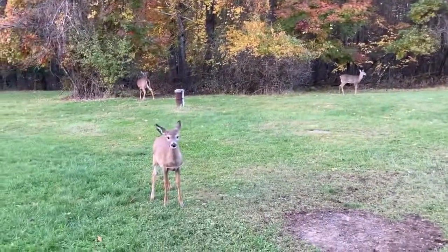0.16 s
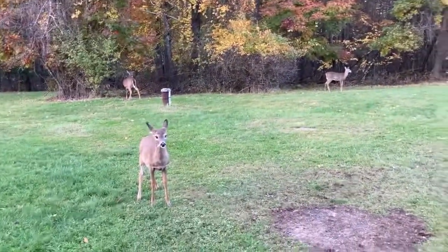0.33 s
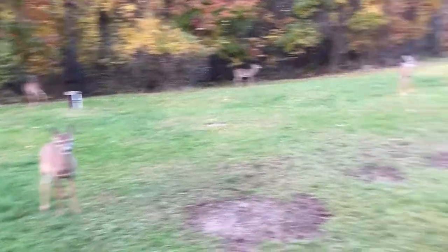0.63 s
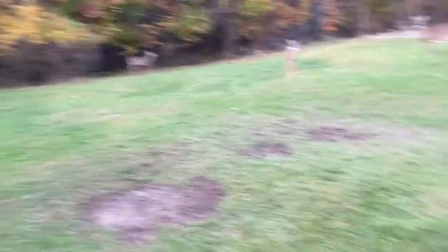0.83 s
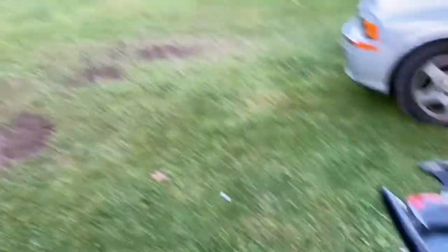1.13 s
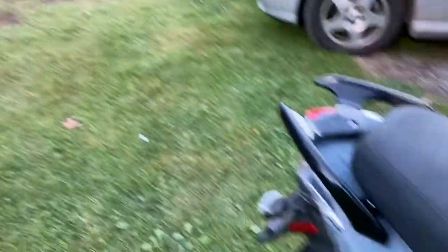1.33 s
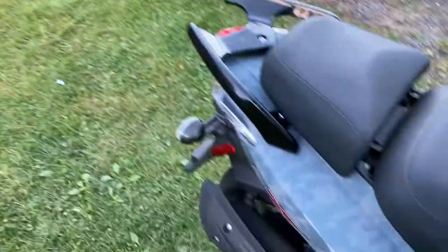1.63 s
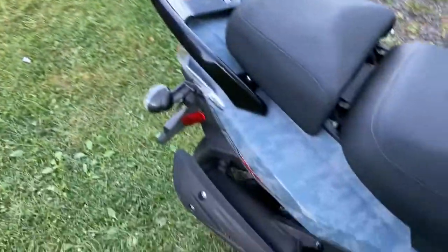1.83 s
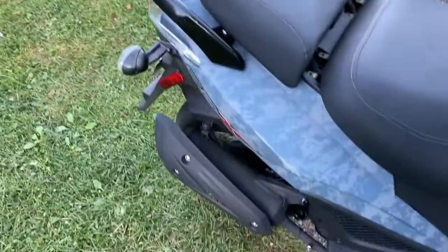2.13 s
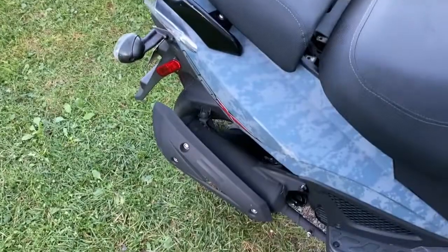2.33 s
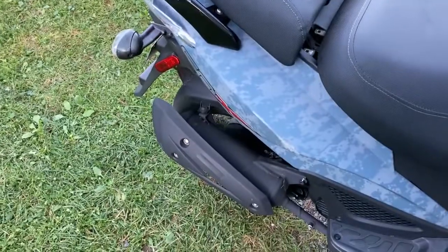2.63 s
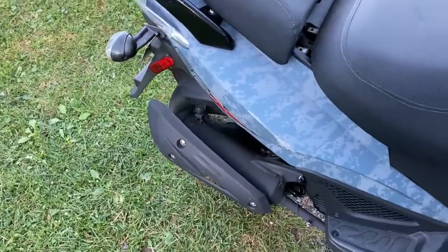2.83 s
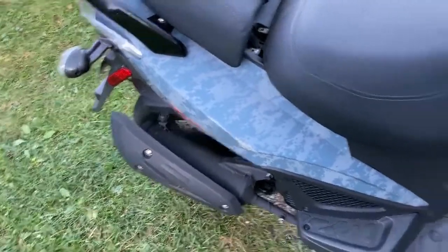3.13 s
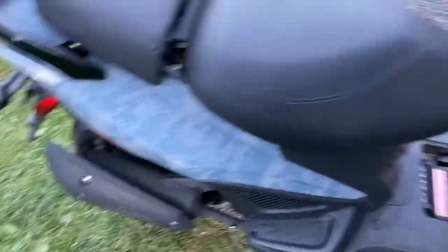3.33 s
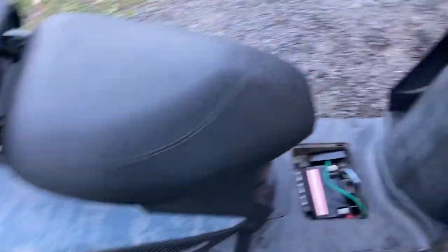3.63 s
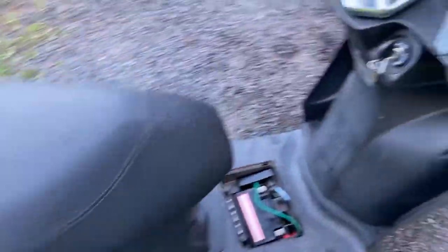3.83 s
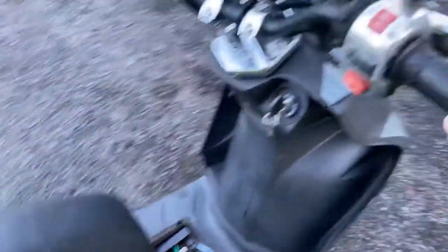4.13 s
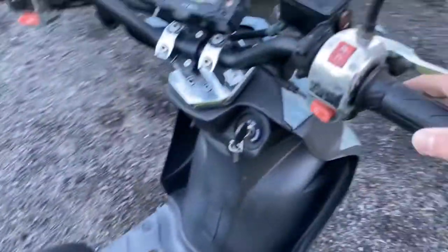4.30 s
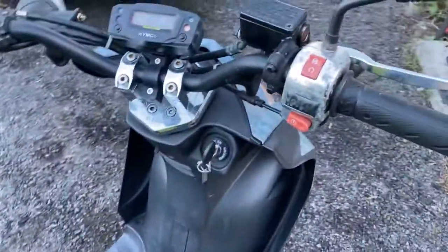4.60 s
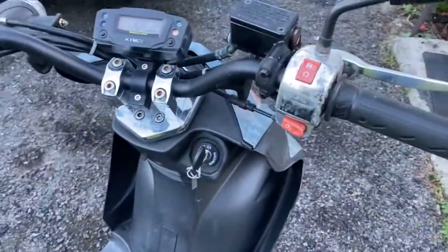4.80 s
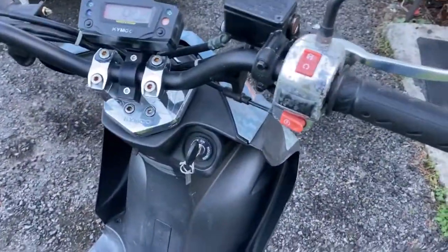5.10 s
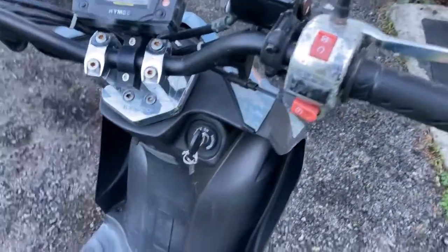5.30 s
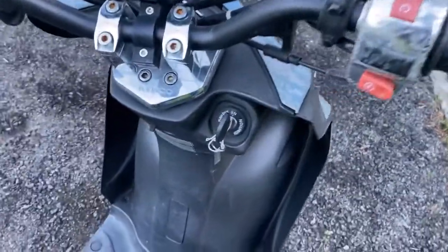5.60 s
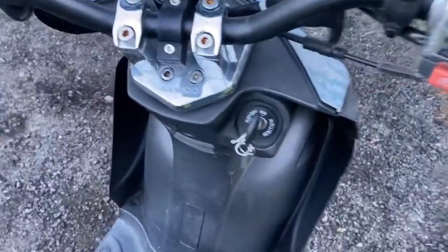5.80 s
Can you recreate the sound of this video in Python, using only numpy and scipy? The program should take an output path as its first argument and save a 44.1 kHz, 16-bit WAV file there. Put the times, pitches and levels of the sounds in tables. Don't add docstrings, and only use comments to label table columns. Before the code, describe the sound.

A small single-cylinder scooter engine is already at full throttle outdoors, standing still, heard through a hand-held phone. From 0 to about 0.5 s the phone faces the field and the drone is somewhat muffled: a low, flat buzz near 64 pulses a second, with rough exhaust and intake roar. Between 0.5 and 1.6 s it swings towards the machine, and the sound grows louder, fuller and brighter. From 1.6 to 3.3 s it is beside the engine, with metallic valve clatter, thin whine and strong airy fan hiss, pitch still steady. From 3.3 to 4.4 s it passes along the seat to the handlebars; clatter and hiss recede, and a faint high chirping buzz appears around 3.8 s. At 4.45 s the throttle closes: roar weakens and pitch slides down by more than half an octave. Around 5.35 s the idle catches, puttering in distinct low puffs with another small chirp, still slowing slightly at the end.

```python
import sys
import numpy as np
from scipy import signal
from scipy.fft import rfft, irfft, next_fast_len
from scipy.io import wavfile
from scipy.ndimage import map_coordinates

SR = 44100
rng = np.random.default_rng(int(sys.argv[2]) if len(sys.argv) > 2 else 0)


def volts_from_db(level):
    exponent = np.asarray(level, float) / 20
    return 10 ** exponent


def inscribe(sig):
    pcm = np.round(np.clip(np.atleast_2d(sig).T, -1, 1) * 32767)
    wavfile.write(sys.argv[1], SR, pcm.astype(np.int16))


N = 262395

# t/s, firing rate f/Hz
FIRING_HZ = [(0, 63.9), (.2, 64.3), (.95, 64.5), (1.25, 64.9), (1.7, 64.4), (2.5, 64.5), (2.92, 64.3),
             (3.38, 64.7), (3.69, 64.4), (3.96, 63.5), (4.39, 64), (4.45, 63.4), (4.71, 56.8), (5.01, 50.1),
             (5.2, 45.5), (5.47, 41.4), (5.65, 40.5), (5.95, 38.7)]
# t/s, left lag/ms, facing scooter/0-1, near engine/0-1, side-on/0-1
POSE = [(0, 0.24, 0, 0.78, 0.04), (.45, 0.2, 0.07, 0.86, 0.12), (.8, 0.24, 0.27, 0.98, 0.37),
        (1.0, 0.18, 0.47, 1, 0.4), (1.25, 0.11, 0.79, 1, 0.45), (1.6, 0.0083, .97, 0.88, 0.62),
        (2.7, 0.019, 0.96, 0.96, 0.94), (3.3, -.04, 1, 0.8, 0.83), (3.7, -0.096, 1, 0.43, 0),
        (4.1, -0.11, 1, 0.1, 0), (4.45, -0.095, 1, 0, 0)]

# multiple/1, level/dB
TURNED_AWAY = [(3, -19), (5, -34), (7, -44), (8, -19), (9, -28), (10, -18.5), (11, -21), (12, -20.5),
               (13, -19.5), (14, -45), (15, -21), (16, -29), (17, -25), (18, -24), (19, -35), (20, -15),
               (21, -30), (22, -15), (23, -24), (25, -16), (26, -34), (27, -39), (28, -22), (29, -29),
               (30, -18), (33, -11)]
PULLING = [(3, -22), (5, -16), (7, -16), (8, -12), (9, -19), (10, -20), (11, -24), (12, -18), (13, -21),
           (14, -21), (15, -22), (16, -21), (17, -23), (18, -18), (19, -20), (20, -21), (21, -24),
           (22, -19), (23, -24), (25, -20), (26, -24), (27, -22), (28, -20), (29, -18), (30, -22),
           (31, -22), (32, -23), (33, -16), (34, -26), (35, -29)]
ABOVE_SEAT = [(3, -32), (5, -20), (7, -41), (8, -15.5), (9, -14), (10, -43), (11, -34), (12, -14.5),
              (13, -38), (14, -28), (15, -38), (16, -18.5), (17, -30), (18, -16), (19, -39), (20, -37),
              (21, -26), (22, -38), (23, -41), (25, -16.5), (26, -24), (27, -38), (28, -25), (29, -19),
              (30, -17)]
SHUTTING = [(3, -32), (5, -28), (7, -31), (8, -14), (9, -23), (10, -20), (11, -33), (12, -36), (13, -38),
            (14, -40), (15, -33), (16, -28), (17, -28), (18, -22), (19, -39), (20, -23)]
COASTING = [(3, -24), (5, -24), (7, -13), (8, -17), (9, -28.5), (10, -22), (11, -41), (12, -17.5),
            (13, -44), (14, -46), (15, -31), (16, -41), (17, -42), (18, -32), (19, -21), (20, -25)]
# multiple of firing rate/1, level/dB
BELT = [(1.685, -12.5), (5.7, -9), (6.72, -5)]

# f/Hz, level/dB
PUFFS = [(20, -14), (45, -8), (100, -7), (200, -9.5), (320, -5), (450, -6), (600, -6.5), (730, -14),
         (1000, -37)]
INTAKE_SIDE = [(500, -89), (740, -2.5), (900, -2), (1300, -2.5), (1600, 0), (2150, -2.5), (2300, -8),
               (2700, -12), (3100, -14), (4500, -47)]
INTAKE_FRONT = [(500, -58), (740, 0), (1000, 2), (1900, 2), (2300, 1), (2750, 0), (3100, -5), (3600, -7.5),
                (5000, -37)]
CASES_SIDE = [(2400, -50), (3200, -6.5), (3450, 2.5), (4100, -4), (4700, 0.5), (5200, -4), (5950, -29),
              (6400, -27), (6950, -9.5), (7300, -21.5), (8150, -2.5), (8700, -28), (11000, -36)]
CASES_FRONT = [(2400, -47), (3200, 4), (3900, 7.5), (4300, 14), (5000, 11.5), (5900, -15), (6700, -19),
               (8000, -38), (11000, -40)]
FAN_SIDE = [(3000, -37), (6000, 7.5), (8000, 4), (9700, 4.5), (11300, 2.5), (12300, 5), (13500, 1.5),
            (14700, -2), (15700, -1)]
FAN_FRONT = [(3000, -14), (6000, -0.5), (7500, -3), (9100, 1.5), (10300, 0), (11000, -1.5), (12600, 0.5),
             (14000, -1), (15700, -8.5)]
# f/Hz, level/dB
SCATTER = [(60, -3), (250, -11.5), (450, -6.5), (800, -9), (1500, -4), (2500, -5), (3600, -4), (5500, 0)]
# f/Hz, width/Hz, level/dB
FIN_RINGS = [(3490, 73, 5.5), (3770, 160, 6.5), (4050, 240, 6.5), (4300, 90, 4), (4594, 57, 5.5),
             (6300, 71, 6), (6470, 150, -2), (7200, 120, -3), (7300, 120, -8)]

PIPE = {1: (-22, -3, -3.5, -8.5, -6), 2: (-24, 0.4, -4, 4.5, 3), 4: (-21, -9, 0, -6.5, -9.5),
        6: (-23, -11.5, -3.5, 4, -15)}
SPRINGS = (-62, 18, -8, -8, -3)
WEAK, BELT_HUM, CHAIN = (-22.5, -3, -4, 6.5, -8.5), (-34.5, 0, -6, -10, -13), (-28, -11, -17, 3.5, -4)
PUFFING, ROAR = (-31, -5, -.3, 1.4, -3.5), (-25, -4.5, -1.4, -1, -7)
CLATTER, FANNING = (-31, -4.5, -12.5, -0.8, -8), (-38, -9, -5, -2, -9)
PANEL_BUZZ = (-82, -1.5, 8, .1, 2)

# t/s, multiple/1, half width/s, loss/dB (negative lifts the tone)
DIPS_AND_SWELLS = [(.03, 6, 0.036, 11), (.23, 6, .03, 9), (3.8, 4, 0.22, -2), (3.7, 6, 0.7, 3.5),
                   (3.92, 2, 0.23, 2), (4.61, 4, 0.059, 22), (4.6, 6, 0.11, -3.5), (5.04, 4, 0.032, 23),
                   (5.13, 6, 0.1, 9), (5.43, 4, 0.19, 11), (5.422, 6, 0.085, 10), (5.55, 6, 0.2, -2.5),
                   (6.1, 4, .3, -3.5), (0.98, 6, 0.26, -3.5), (5.51, 12, 0.2, -13.5), (5.03, 8, 0.16, -7),
                   (4.56, 8, .12, -1.5), (5.65, 10, .2, -7), (5.55, 8, .12, -8)]
# t/s, length/s, level/dB
CHIRPS = [
    (3.78, .6, -57),
    (5.365, .7, -48.5),
]

# f/Hz, left over right level/dB, left lead/rad
LEAN_AWAY = [(60, -4, -0.22), (130, -3, -.1), (260, -6, -0.13), (390, -6, -0.73), (700, -9.5, -0.41),
             (1410, -2, 0.13), (2500, -1, 0.37), (5000, 1.5, -0.046)]
LEAN_SIDE = [(60, -2.1, -0.11), (130, -2.6, .13), (260, -2, -0.24), (390, .5, 0.068), (815, -0.5, -0.19),
             (1660, 5, -0.36), (2470, 2, -.6), (3600, 1.7, 0.45)]
LEAN_FRONT = [(60, -2.5, -0.15), (130, -2.2, .1), (260, -0.7, -0.0013), (372, -0.3, 0.56), (650, 3, 0.38),
              (1000, 6, 0.52), (1910, 5, -0.029), (4200, 0.5, 0.25)]

SHUT_S, SNAP_S, SAG_S = 4.45, 0.061, 0.69
CATCH_S, RECOVER_S, IDLE_EFFORT = 5.33, 0.048, 0.35
PULSE_RAD = 1.625


def unit(x):
    return x / np.sqrt(np.mean(x ** 2) + 1e-20)


def along(points, hz):
    f, v = np.transpose(points)
    return np.interp(np.log(hz + 1), np.log(f + 1), v)


def curves(rows):
    s, *cols = np.transpose(rows)
    return [np.interp(np.arange(N) / SR, s, c) for c in cols]


def ramp(start_s, length_s):
    return np.clip((np.arange(N) / SR - start_s) / length_s, 0, 1)


def wobble(rate_hz):
    knots = rng.standard_normal(int(N * rate_hz / SR) + 4)
    return np.interp(np.arange(N) * rate_hz / SR, np.arange(len(knots)), knots)


def filtered(x, response):
    m = next_fast_len(N + SR // 4)
    spectrum = rfft(x, m) * response(np.fft.rfftfreq(m, 1 / SR))
    return irfft(spectrum, m)[..., :N]


def coloured(x, spectrum):
    return unit(filtered(x, lambda hz: volts_from_db(along(spectrum, hz))))


def resonance(f, centre_hz, width_hz):
    damping = 1j * f * width_hz
    return damping / (centre_hz ** 2 - f * f + damping)


def controls():
    facing, near = np.clip(curves(POSE)[1:3], 0, 1)
    lost = ramp(SHUT_S, SAG_S) - IDLE_EFFORT * ramp(CATCH_S, RECOVER_S)
    return np.array([1 - facing, 1 - near, ramp(SHUT_S, SNAP_S), lost])


def heard(layer):
    return layer[0] + np.dot(layer[1:], controls())


def sharpness():
    sharp_from_hz, sharp_over_hz = 59.2, 23
    return np.clip((sharp_from_hz - curves(FIRING_HZ)[0]) / sharp_over_hz, 0, 1)


def dips(k):
    t = np.arange(N) / SR
    return sum(db * np.clip(1 - abs(t - s) / half_s, 0, 1) for s, m, half_s, db in DIPS_AND_SWELLS if round(m) == k)


def tone(turn, shake_db, rate_hz, free=1):
    drift = np.pi * rng.uniform(-1.06, 1) + 0.054 * shake_db * wobble(rate_hz)
    return np.sqrt(2) * volts_from_db(shake_db * wobble(rate_hz)) * np.cos(turn + free * drift)


def racket(cycle, repeat, beat_db, size=700):
    slot = (cycle / (2 * np.pi) % 1 * size).astype(int)
    drift = 1.3 * wobble(3)
    shapes = rng.standard_normal((2, 2, size))[..., slot]
    habit = np.cos(drift) * shapes[0] + np.sin(drift) * shapes[1]
    share = np.clip(repeat, 0, 1)
    mix = np.sqrt(share) * habit + np.sqrt(1 - share) * rng.standard_normal((2, N))
    beat = np.cos(cycle) + 0.64 * np.cos(2 * cycle + 0.37)
    return mix * volts_from_db(beat_db * beat + 0.68 * wobble(13))


def seen(x, share, side, front):
    return share * coloured(x, side) + (1 - share) * coloured(x, front)


def side_on():
    return np.clip(curves(POSE)[-1], 0, 1)


def panel(cycle):
    edge_s = 0.029
    kicks = rng.standard_normal(N) * volts_from_db(4.5 * np.cos(2 * cycle) + .8 * wobble(25))
    ringing = unit(filtered(kicks, lambda f: resonance(f, 5830, 45)))
    spells = sum(volts_from_db(db) * (ramp(s, edge_s) - ramp(s + length_s, 4 * edge_s)) for s, length_s, db in CHIRPS)
    return (volts_from_db(heard(PANEL_BUZZ)) + spells) * ringing


def fan(cycle):
    air = racket(cycle, repeat=0.076, beat_db=1.38)
    return volts_from_db(heard(FANNING) + 7.5) * seen(air, side_on(), FAN_SIDE, FAN_FRONT)


def cases_on():
    return np.clip(1.7 * side_on(), 0, 1)


def fins(x):
    return filtered(x, lambda f: 1 + sum((volts_from_db(db) - 1) * resonance(f, c, w) for c, w, db in FIN_RINGS))


def clatter(cycle):
    knocks = fins(racket(cycle, repeat=.65, beat_db=1.5))
    return volts_from_db(heard(CLATTER) + 2.5) * seen(knocks, cases_on(), CASES_SIDE, CASES_FRONT)


def intake(cycle):
    air = racket(cycle, repeat=0.11, beat_db=0.4)
    return volts_from_db(heard(ROAR) - 0.62) * seen(air, cases_on(), INTAKE_SIDE, INTAKE_FRONT)


def gas_puffs(cycle):
    return volts_from_db(heard(PUFFING) + 2.5) * coloured(racket(cycle, repeat=0.019, beat_db=0.0), PUFFS)


def valve_springs(cycle):
    return volts_from_db(heard(SPRINGS)) * (tone(67 * cycle, 2.5, 20) + .6 * tone(54 * cycle, 2.5, 20))


def gear_whistle(cycle):
    resonance_hz, width_hz, level_db = 1374, 24, -33
    off_hz = 36 * curves(FIRING_HZ)[0] - resonance_hz
    mesh = tone(36 * cycle, shake_db=1.5, rate_hz=15)
    return volts_from_db(level_db) * mesh / np.hypot(1, 2 * off_hz / width_hz)


def chain_whine(cycle):
    return volts_from_db(heard(CHAIN)) * tone(24 * cycle, shake_db=.6, rate_hz=15)


def belt_hum(cycle):
    return volts_from_db(heard(BELT_HUM)) * sum(volts_from_db(db) * tone(k * cycle, shake_db=6.5, rate_hz=10) for k, db in BELT)


def overtones(cycle):
    away, far, shut, _ = controls()
    stage = 1 - away + np.clip((far - .18) / 0.17, 0, 1) + shut + ramp(CATCH_S - .25, 0.44)
    patterns = [dict(p) for p in (TURNED_AWAY, PULLING, ABOVE_SEAT, SHUTTING, COASTING)]
    loose = 1 - 0.52 * sharpness()
    weak = 0
    for k, _ in PULLING:
        level_db = np.interp(stage, range(len(patterns)), [p.get(k, -38) for p in patterns])
        sine = tone(k * (cycle - PULSE_RAD), shake_db=1.7 + 1.2 * loose, rate_hz=14, free=1.3 * loose)
        weak = weak + volts_from_db(level_db - dips(k)) * sine
    return volts_from_db(heard(WEAK)) * weak


def exhaust(cycle):
    blur = 1 - sharpness()
    tones = 0
    for k, layer in PIPE.items():
        spread_rad = np.angle(np.exp(1j * (2.87 + .095 * k * k - k * PULSE_RAD)))
        level_db = heard(layer) - dips(k) + 0.72 * wobble(20)
        tones = tones + np.sqrt(2) * volts_from_db(level_db) * np.cos(k * (cycle - PULSE_RAD) - blur * spread_rad)
    return tones


def treble(hz):
    return np.clip((hz - 5300) / 60, 0, 1)


def shaded(ports, side):
    away, far, *_ = controls()
    front = np.clip((far - .12) / .4, 0, 1)

    def colour(lean, hz):
        level = volts_from_db(side * along(lean[:, :2], hz))
        phase = np.exp(1j * side * along(lean[:, ::2], hz))
        return level * phase * np.sqrt(1 - treble(hz))

    poses = zip((away, 1 - away - front, front), map(np.array, (LEAN_AWAY, LEAN_SIDE, LEAN_FRONT)))
    return sum(filtered(share * ports, lambda hz: colour(lean, hz)) for share, lean in poses)


def scene():
    speed_hz = 1.002 * curves(FIRING_HZ)[0]
    cycle = 2 * np.pi * np.cumsum(speed_hz * (1 + .0012 * wobble(30))) / SR
    noise, stray = fan(cycle) + clatter(cycle) + intake(cycle) + gas_puffs(cycle)
    tones = panel(cycle) + valve_springs(cycle) + gear_whistle(cycle) + chain_whine(cycle)
    tones = tones + belt_hum(cycle) + overtones(cycle) + exhaust(cycle)

    side = np.array([[.5], [-.5]])
    turn = lambda hz: np.arctan(volts_from_db(along(SCATTER, hz)))
    direct = filtered(noise, lambda hz: np.cos(turn(hz)))
    scattered = filtered(stray, lambda hz: np.sin(turn(hz)))
    both = tones + direct + 2 * side * scattered
    lag_ms = curves(POSE)[0]
    late = np.arange(N) - side * lag_ms * SR / 1000
    ports = np.array([map_coordinates(x, [at], mode="nearest") for x, at in zip(both, late)])
    low = shaded(ports, side)

    loose = 0.14 + 0.21 * controls()[0]
    wide = loose * stray + filtered(stray, lambda hz: np.clip((7700 - hz) / 2400, 0, 1))
    twist = lambda hz: np.exp(-1j * side * 2 * np.pi * (hz - 2380) / 4520)
    high = filtered(tones + noise + 2 * side * wide, lambda hz: np.sqrt(treble(hz)) * twist(hz))
    return low + high


def band_limit(x):
    return signal.sosfilt(signal.butter(12, 15910, fs=SR, output="sos"), x)


def record(dry):
    top_hz = 15760
    mix = filtered(dry, lambda hz: hz < top_hz)
    return band_limit(mix)


dry = scene()
out = record(dry)
inscribe(out)
```